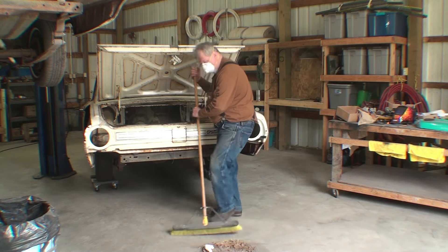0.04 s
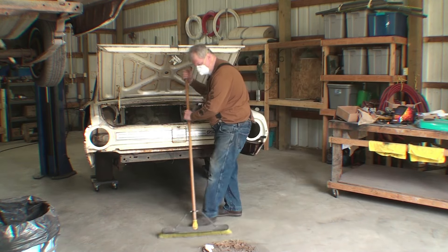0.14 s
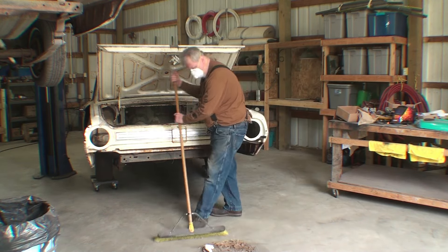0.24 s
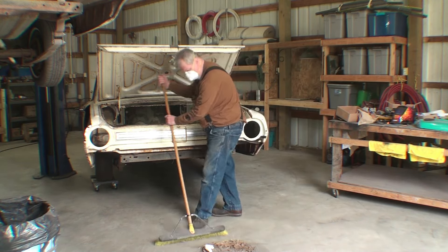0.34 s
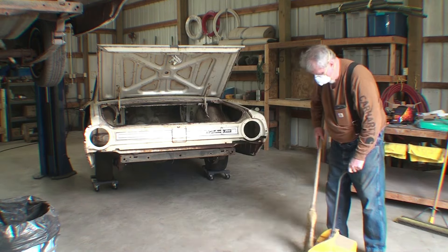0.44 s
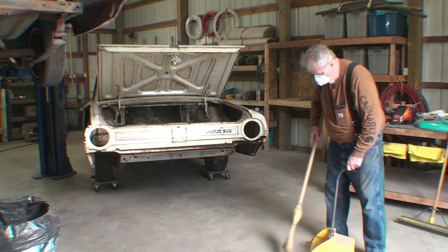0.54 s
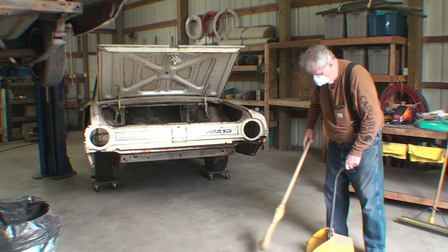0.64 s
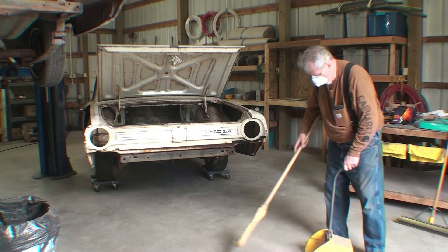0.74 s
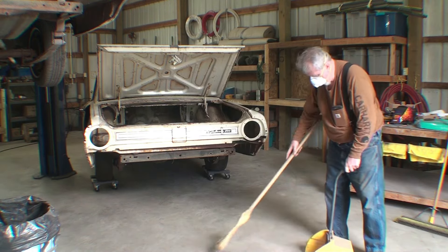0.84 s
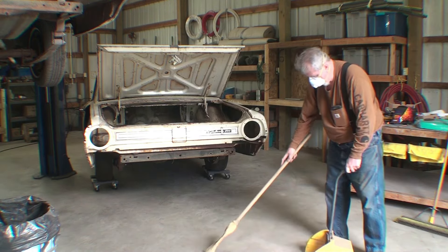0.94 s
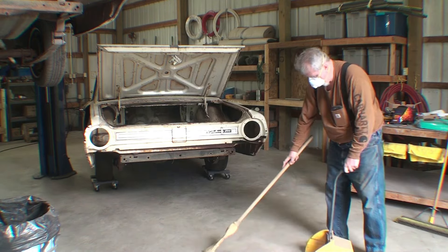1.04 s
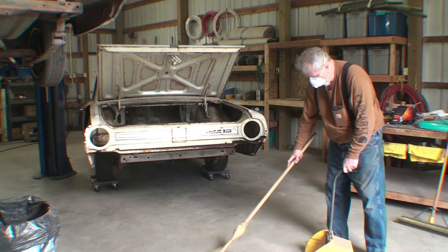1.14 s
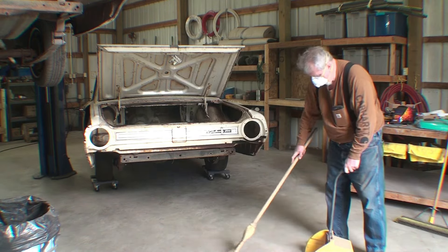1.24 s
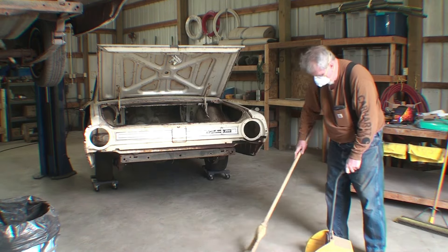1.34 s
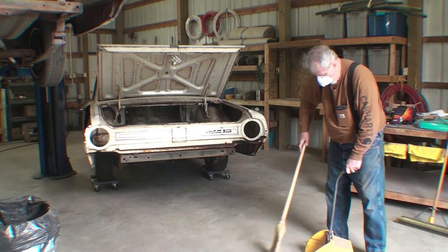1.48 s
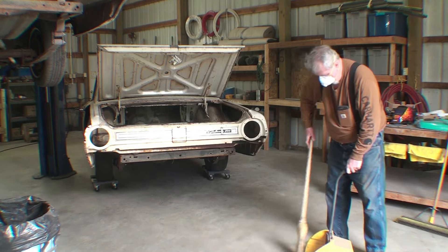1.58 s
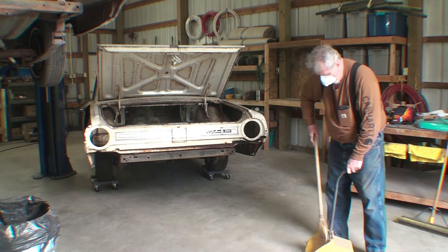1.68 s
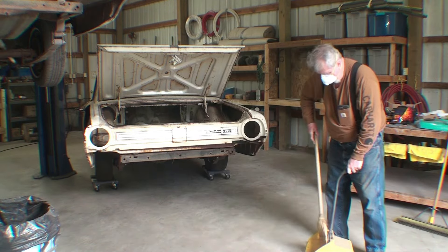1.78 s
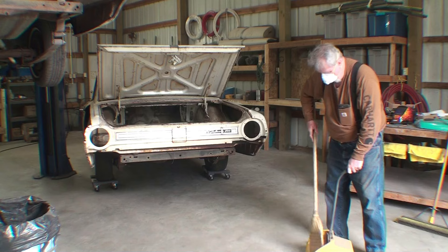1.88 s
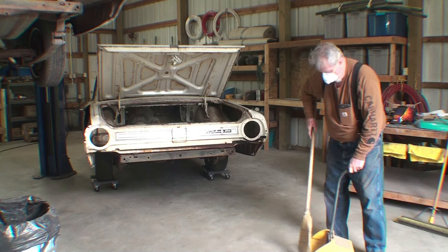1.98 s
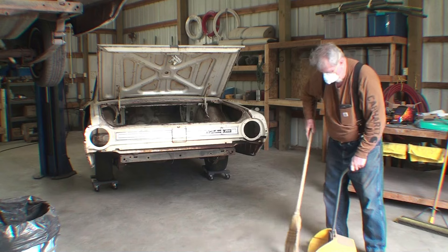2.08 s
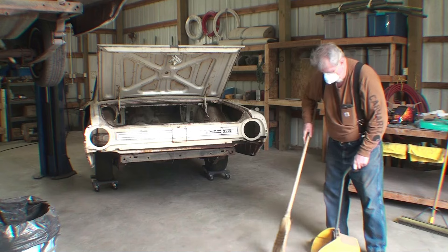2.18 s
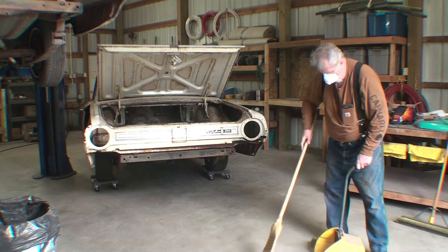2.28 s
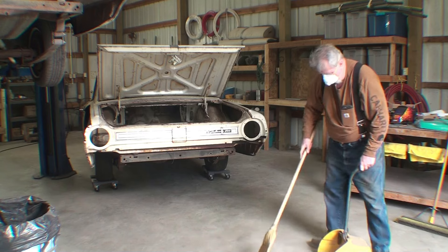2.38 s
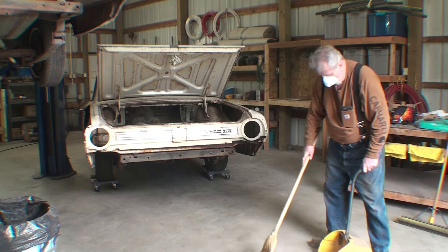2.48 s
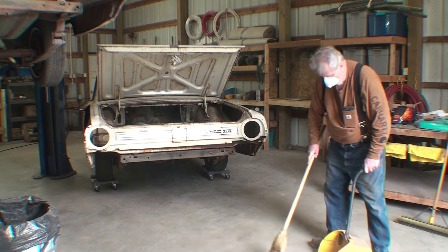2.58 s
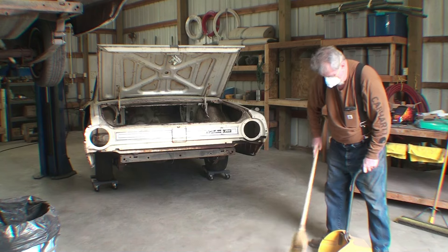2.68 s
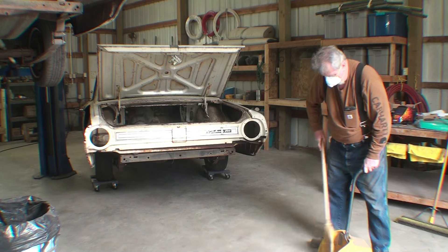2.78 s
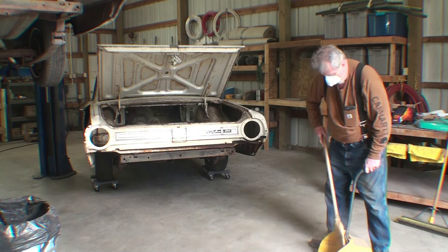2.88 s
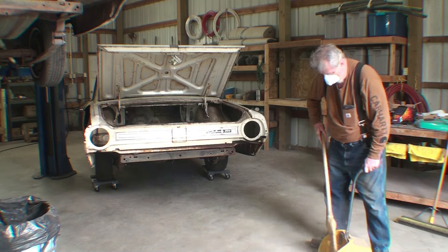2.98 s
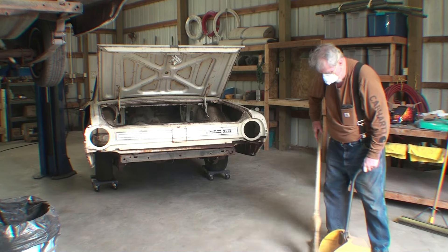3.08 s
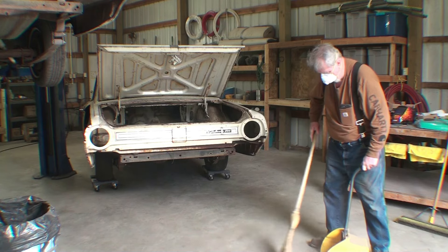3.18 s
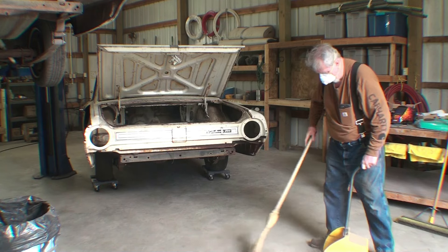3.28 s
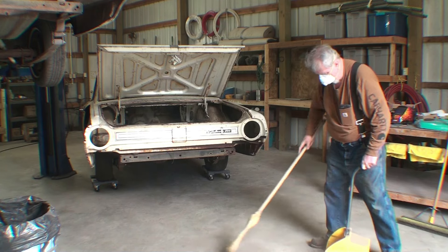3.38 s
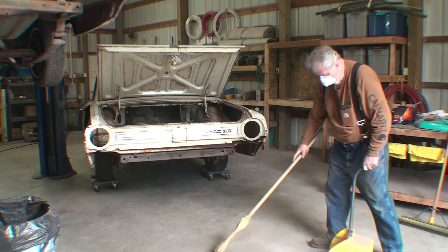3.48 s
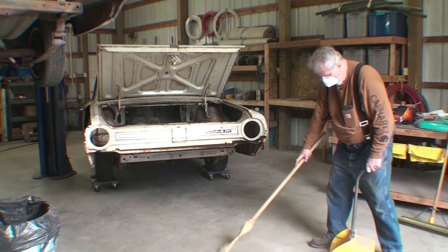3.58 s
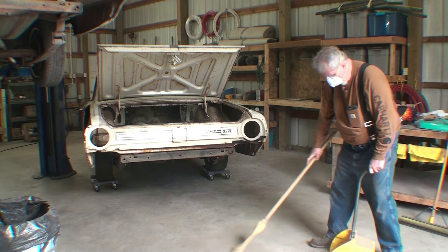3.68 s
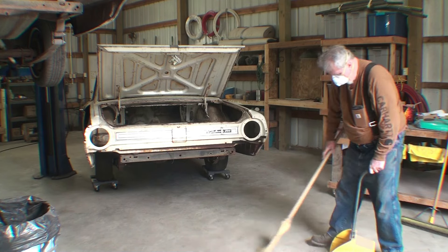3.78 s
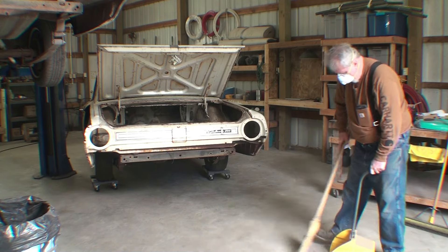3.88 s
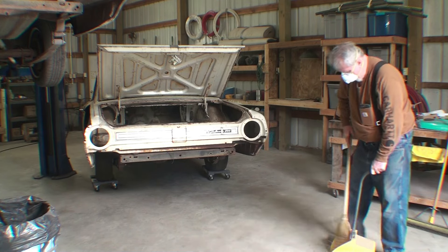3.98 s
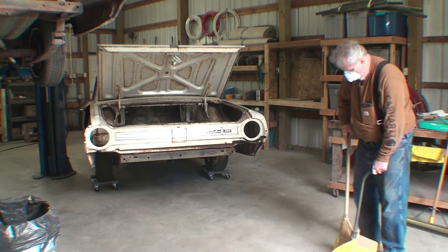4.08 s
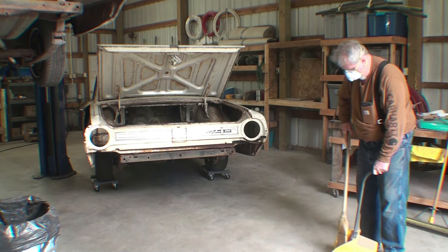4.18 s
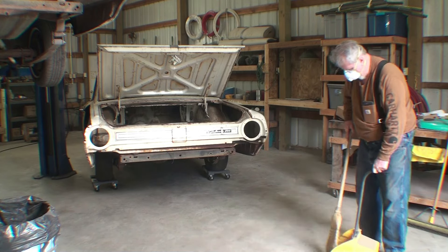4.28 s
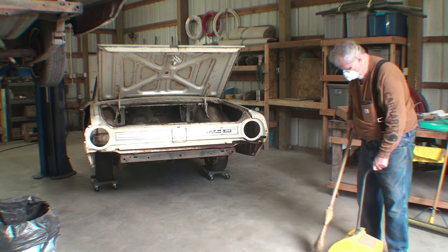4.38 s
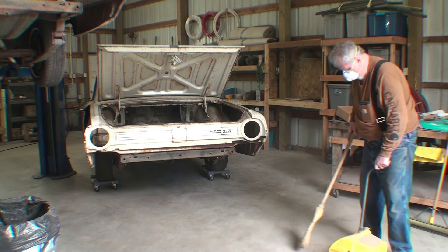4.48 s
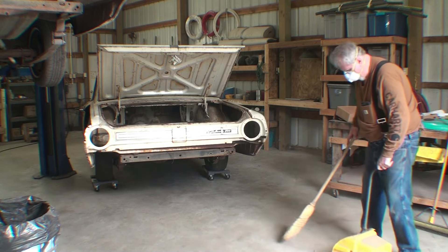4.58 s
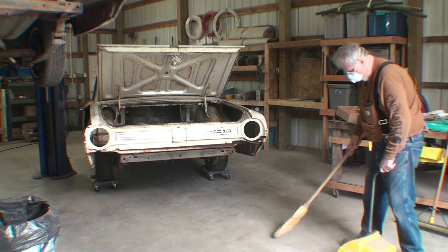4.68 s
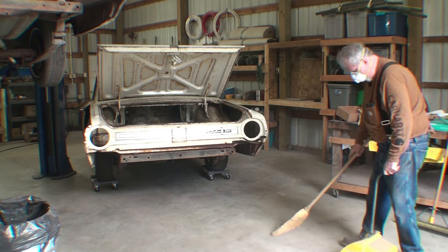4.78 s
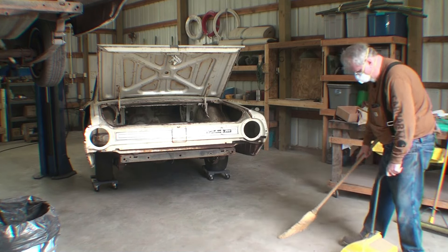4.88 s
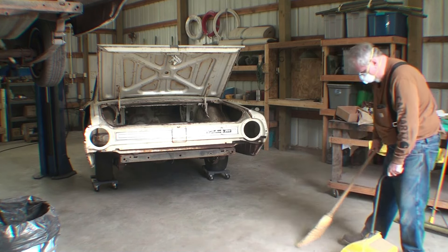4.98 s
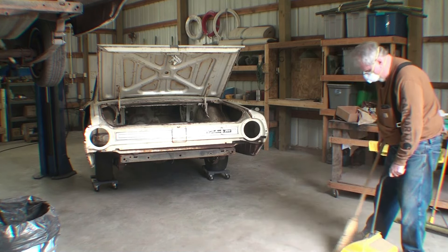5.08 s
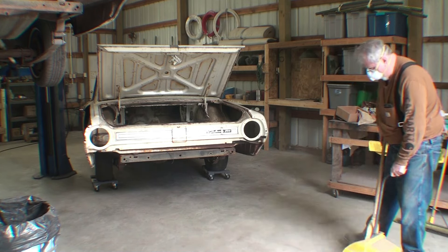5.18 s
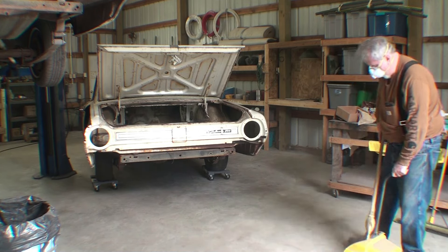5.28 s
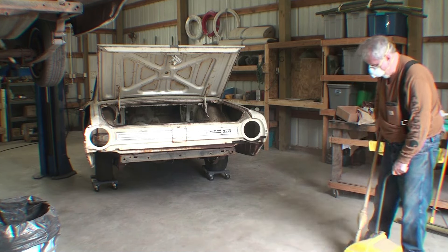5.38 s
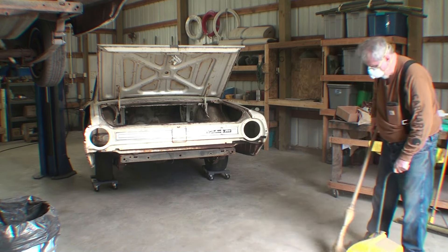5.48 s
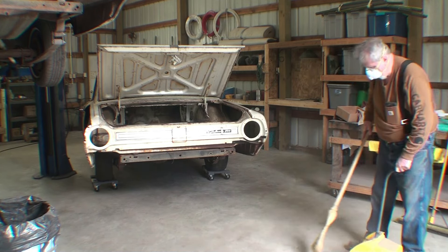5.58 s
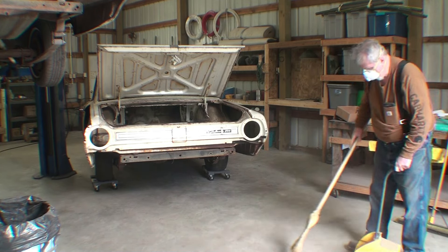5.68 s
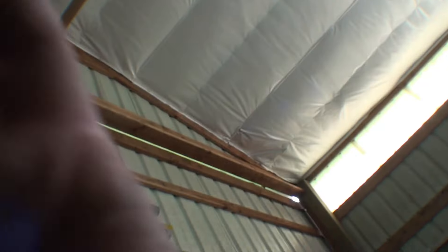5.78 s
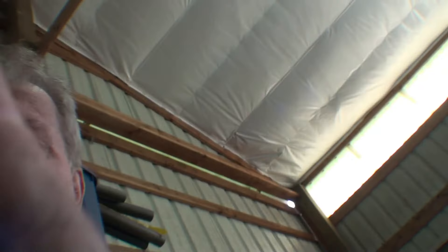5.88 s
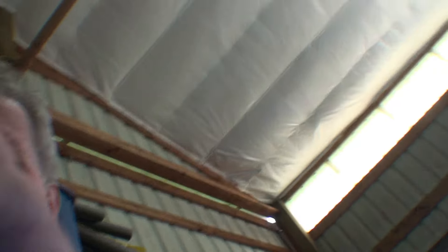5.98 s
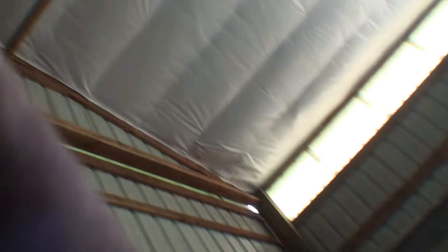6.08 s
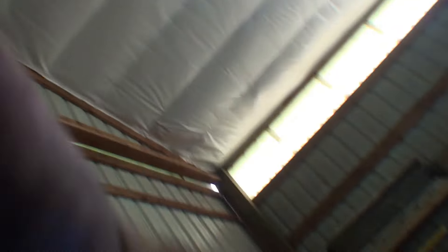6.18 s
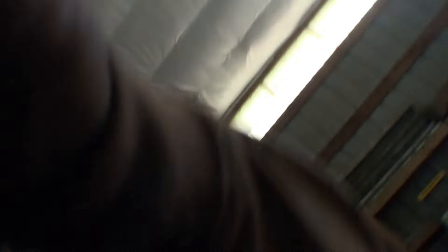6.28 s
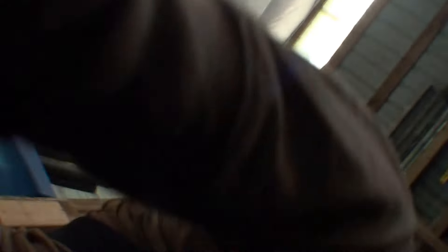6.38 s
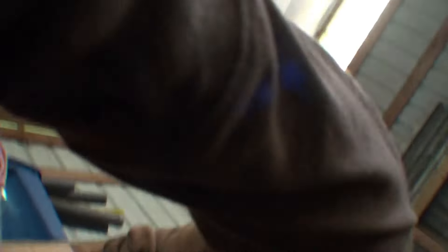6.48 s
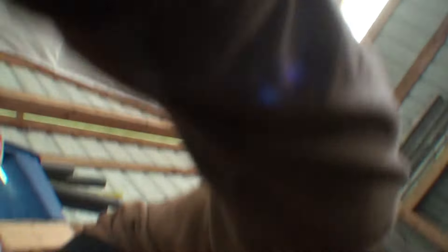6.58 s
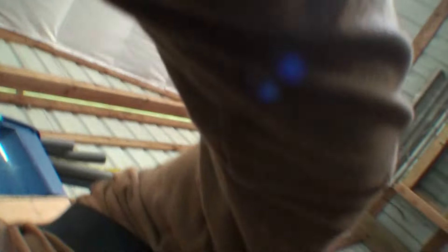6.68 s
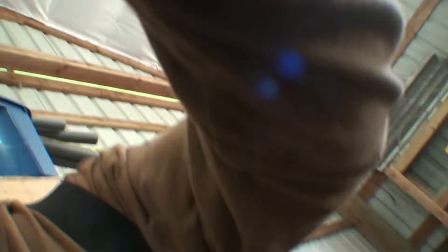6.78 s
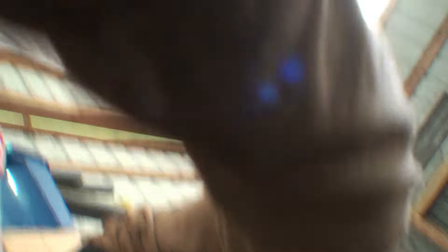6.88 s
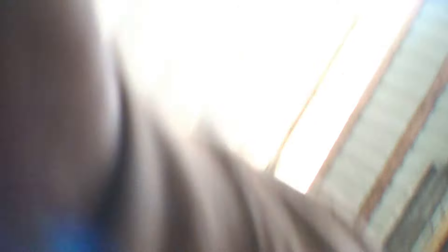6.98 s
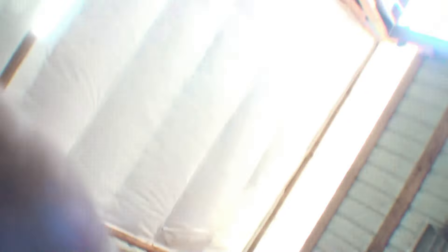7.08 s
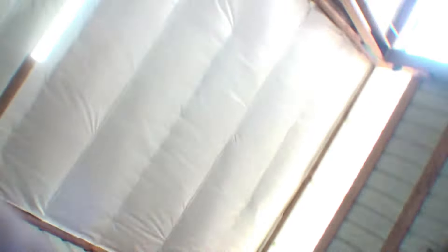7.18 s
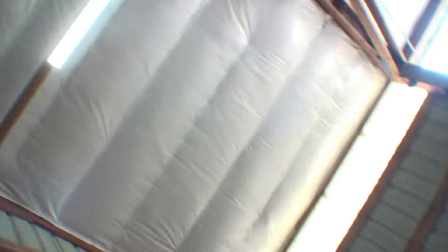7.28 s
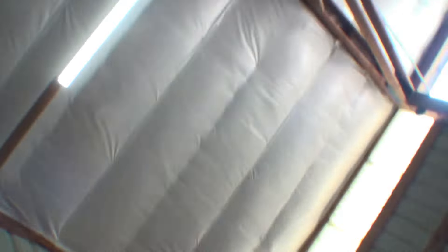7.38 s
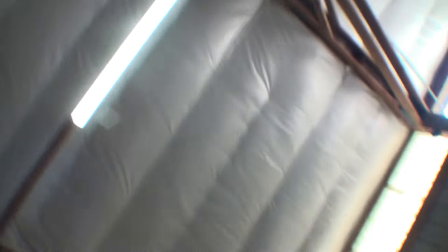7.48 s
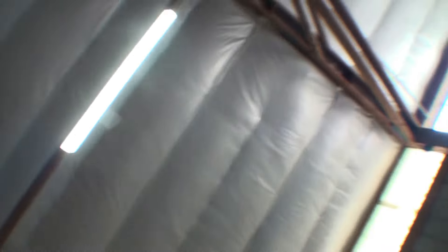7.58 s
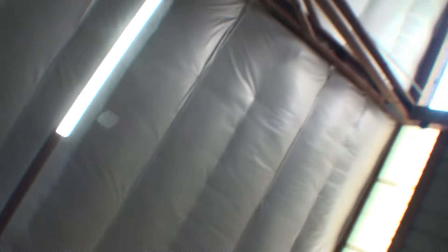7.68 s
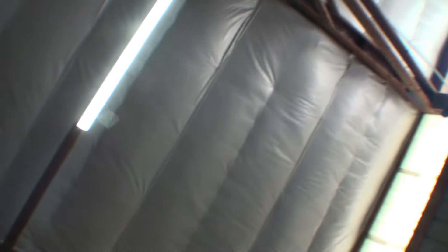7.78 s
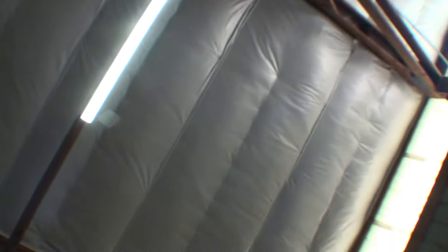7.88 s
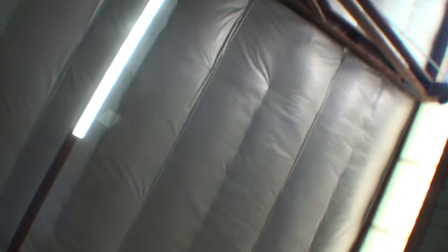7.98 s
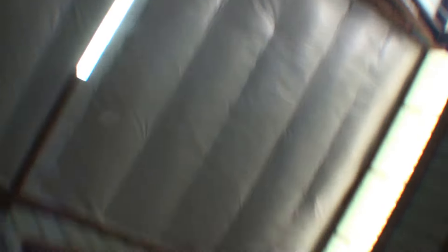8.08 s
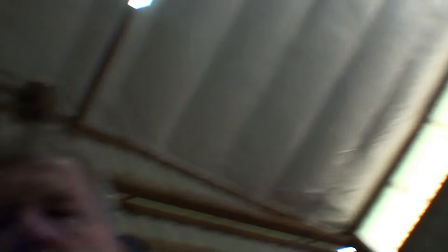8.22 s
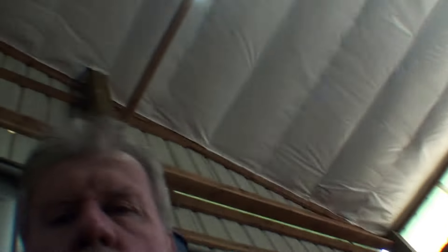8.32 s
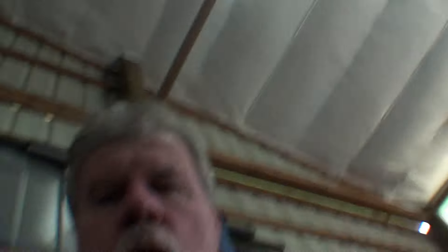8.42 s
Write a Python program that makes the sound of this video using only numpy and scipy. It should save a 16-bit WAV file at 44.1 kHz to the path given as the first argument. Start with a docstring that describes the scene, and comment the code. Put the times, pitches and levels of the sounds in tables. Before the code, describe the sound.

Bristly sweeping strokes and loud clattering knocks on a plastic dustpan ring through a garage, ending abruptly in quiet microphone taps, snaps and sleeve rubbing.

```python
"""Three shots in a steel-clad garage. First a push broom hisses over concrete: band-shaped friction noise.
After a cut a straw broom sweeps dust into a plastic upright dustpan: its modes boom when it is set down
or struck, cracks scatter grit, and dragged edges scrape. The garage answers with sparse reflections.
After a second cut a hand-held camera is turned about: its case clicks and creaks by modal ringing and
stick-slip, and sleeves rustle as gated friction noise. Steady noise forms the air of each shot."""
import sys
import numpy as np
from scipy import signal
from scipy.fft import rfft, irfft, next_fast_len
from scipy.io import wavfile
from scipy.ndimage import uniform_filter1d, minimum_filter1d

SR = 44100
rng = np.random.default_rng(int(sys.argv[2]) if len(sys.argv) > 2 else 0)


def materialize(psi):
    """Save the field psi as 16-bit PCM at rate SR to the path in sys.argv[1].

    A 1-D psi becomes a single channel; in a 2-D psi each row is a channel.
    """
    bounded = np.clip(np.atleast_2d(psi).T, -1, 1)
    quanta = np.round(bounded * 32767).astype(np.int16)
    wavfile.write(sys.argv[1], SR, quanta)


N = 372630
T = np.arange(N) / SR  # time [s]
# sudden brushes and scuffs that fade; the first is the tail of a thump, entered at the cut:
# (time [s], bristle level [dB], scuff level [dB], scuff fade [dB/s])
FADING_SCUFFS = [(0.434, -59, -38.5, 43), (.772, -43, -39.5, 67), (2.433, -49, -22, 160),
                 (3.534, -46, -30.5, 26.5), (4.709, -54.5, -42.5, 198.5), (4.755, -41, -31.5, 94)]
CHATTER_S = 0.0076  # decay time of the chatter after a blow of neutral hardness
CONTACT = 1.41  # first touch of a blow, relative to the rms at which its chatter starts
BURST_DECAY_S = 0.0035  # decay time of cracks and of finger ticks


def broom():
    """Friction: many bristle tips slip on concrete; the broom head adds modal knocks."""
    # bristle hiss swells; the row at .425 is a faint trace of hiss that dies at once after the cut:
    # (start [s], fastest [s], time from which it dies away [s], level at fastest [dB], end level [dB])
    hiss_swells = [(.06, .115, 0.17, -37, -36), (.16, .23, 0.41, -28, -26), (.425, .432, 0.4, -49, -69),
                   (.92, 1.01, 1.15, -46, -59.5), (1.05, 1.33, 1.8, -35, -33.5),
                   (2.51, 2.8, 2.934, -27, -35), (2.95, 3.03, 3.164, -41, -47.5),
                   (3.48, 3.94, 4.06, -28, -28.5), (4.8, 5.09, 5.22, -33, -24.5)]
    # spectrum of the bristle hiss: (frequency [Hz], relative level [dB per Hz])
    bristle_spectrum = [(180, -33), (300, -17), (624, -8.5), (1080, -9), (1870, -4.5), (7820, 3.5),
                        (16000, -11.5)]
    # push-broom head on the floor: (time [s], peak level [dB], hardness [dB/octave])
    knocks = [(.115, -18, -3.5), (.127, -18, 28)]
    # modes of the head: (frequency [Hz], level [dB], t60 [s])
    head_modes = [(666, -6, 0.014), (984, -4, 0.026), (2022, -7, 0.044)]
    brush_fade_db_per_s = 202.5

    tips = evened(colour(grit(per_s=8200, spread_db=2.5, smooth=1.2), bristle_spectrum))
    brush = sudden_fades(np.transpose(FADING_SCUFFS)[1], [brush_fade_db_per_s] * len(FADING_SCUFFS))
    out = (moved(hiss_swells, rise=1.94) + brush) * tips
    chatters = rng.standard_normal((len(knocks), 1500))
    for (s, db, tilt_db), chatter in zip(knocks, chatters):
        ring, _ = strike(head_modes, tilt_db, CHATTER_S, chatter)
        add(out, s, gain_of(db) * ring)
    return out


def dustpan_booms():
    """Modal resonance: blows excite the damped modes of the hollow plastic dustpan."""
    # blows: (time [s], peak level before the bass cut [dB], hardness [dB/octave])
    blows = [(.434, -25, -5), (.485, -22.5, 5), (0.499, -14.5, 3), (.843, -12.5, -7), (.868, -22.5, -1),
             (1.661, -18, 10), (1.677, -5.5, 6.5), (1.714, -2, 2.5), (1.729, 1.5, 7), (2.436, -11, 8),
             (2.468, -0.5, -1), (2.479, -8.5, -1), (2.497, -7, -10.5), (2.856, -11.5, 10), (2.899, 0.5, 4),
             (2.925, -9.5, -4), (3.008, -7.5, 7.5), (3.677, -3.5, -16), (3.995, -5.5, -1), (4.03, -9.5, 11),
             (4.04, -0.5, -1.5), (4.059, 0.5, 2.5), (4.424, -32, 10), (4.71, -18, 2.5), (4.851, -13, -18.5),
             (5.18, -1.5, 0), (5.202, 6, -10.5), (5.229, -4, 17.5)]
    # modes of the dustpan: (frequency [Hz], level [dB], t60 [s])
    pan_modes = [(135, -15.5, 0.092), (223, 2, 0.072), (258, 0, 0.069), (282, -0.5, 0.057),
                 (360.4, -1, 0.045), (452, -7, 0.024), (512, -8.5, 0.034), (636, -8, 0.078),
                 (686, -10.5, 0.067)]
    chatter_growth_db = 0.12  # dB of chatter time per unit of hardness

    boom = np.zeros(N)
    chatters = rng.standard_normal((len(blows), 3000))
    for (s, db, tilt_db), chatter in zip(blows, chatters):
        rattle = CHATTER_S * gain_of(chatter_growth_db * tilt_db)
        ring, _ = strike(pan_modes, tilt_db, rattle, chatter, order=1)
        add(boom, s, gain_of(db) * ring)
    return no_bass(boom, 134)


def cracks_and_grit():
    """Broadband impact: broom on plastic gives a decaying noise burst and scatters swept grit into the pan."""
    # cracks: (time [s], crack peak level [dB], grit scale [dB], hardness [dB/octave])
    cracks = [(0.4867, -24, -31, -6), (1.677, -7.5, -14, -5), (1.6891, -10, -19.5, -1.5),
              (1.711, 0, -3, -2), (2.8554, -7, -24, -3), (2.8973, -5, -13, -0.5), (3.0088, -10, -15, -6.5),
              (4.0386, 7, -3, -1.5), (4.7102, -25.5, -27, -4.5), (4.782, -17, -27, 3.5),
              (5.178, 1, -8, -0.5), (5.199, -12.5, -1, -2)]
    # spectrum of cracks and grit: (frequency [Hz], gain [dB])
    crack_spectrum = [(290, -25.5), (500, -1), (5500, -6.5), (9360, -26), (16000, -32)]
    grit_s = 0.026  # the grit is loudest this long after the crack

    crack, spray = np.zeros((2, N))
    pivot_hz = crack_spectrum[1][0]
    u = np.arange(8000) / SR / grit_s
    chatters = rng.standard_normal((len(cracks), 1000))
    for (s, db, grit_db, tilt_db), chatter in zip(cracks, chatters):
        burst = np.append(CONTACT, chatter[1:]) * np.exp(-np.arange(len(chatter)) / SR / BURST_DECAY_S)
        tilted = [(f, v + tilt_db * np.log2(f / pivot_hz)) for f, v in crack_spectrum]
        snap = colour(burst, tilted)
        add(crack, s, gain_of(db) * snap / abs(snap).max())
        add(spray, s, gain_of(grit_db) * u * np.exp(-u))  # swells and thins out
    return crack, colour(spray * grit(per_s=3500, spread_db=4.0, smooth=0.65), crack_spectrum)


def drags_and_scuffs():
    """Sliding friction: the broom head or the lip of the dustpan scrapes dully over the floor."""
    # drags: (start [s], fastest [s], end [s], level at fastest [dB], level at end [dB])
    drags = [(.1, .118, 0.2, -27.5, -45.5), (.15, .3, 0.42, -44, -43), (.465, .49, 0.56, -30, -52),
             (2.78, 2.86, 3, -27.5, -28.5)]
    # spectrum of the scrape: (frequency [Hz], relative level [dB per Hz])
    lip_spectrum = [(59, -37), (100, -9.5), (283, -4), (684, -4.5), (12000, -30), (15600, -58)]
    scrape = evened(colour(grit(per_s=3100, spread_db=3.0, smooth=1.0), lip_spectrum))
    scuffs = sudden_fades(*np.transpose(FADING_SCUFFS)[2:])
    return (moved(drags, rise=2.4) + scuffs) * scrape


def camera_taps():
    """Modal resonance at close range: taps and snaps ring small parts and add a brighter contact tick."""
    # taps on the body: (time [s], level before the bass cut [dB], hardness [dB/octave], left-right [dB])
    clicks = [(5.873, -26, 3, 4), (6.348, -12.5, 5, 6.5), (6.36, -30, 10, -23), (6.447, -30.5, -15.5, 0),
              (6.751, -36.5, -9, 1), (6.893, -32, 12.5, 8), (7.086, -57, 21.5, 7.5), (7.601, -29.5, 8, 6),
              (8.109, -37, -7, -1), (8.184, -20, -8.5, 0)]
    # modes of the body: (frequency [Hz], level [dB], t60 [s])
    case_modes = [(280, 0.5, 0.097), (564, 7, 0.042), (1000, 17.5, 0.029), (1095, 9, 0.044),
                  (1570, 23, 0.0055), (2310, 5.5, .01)]
    # snaps of a loose flap: (time [s], level before the bass cut [dB], hardness [dB/octave], left-right [dB])
    snaps = [(6.964, -7, 4, 6), (7.87, -46, 6, 11), (7.881, -9, 5, 6.5)]
    # modes of the flap: (frequency [Hz], level [dB], t60 [s])
    flap_modes = [(765, 0.5, 0.023), (1292, -4, 0.013), (1506, -1.5, .012), (2310, -7.5, 0.02)]

    # each tap: modes, chatter decay [s], lowest frequency [Hz], then its row
    taps = [(case_modes, .0012, 238, *row) for row in clicks]
    taps += [(flap_modes, .003, 560, *row) for row in snaps]
    out = np.zeros((2, N))
    chatters = rng.standard_normal((len(taps), 1500))
    for (modes, rattle, low_hz, s, db, tilt_db, pan_db), chatter in zip(taps, chatters):
        ring, push = strike(modes, tilt_db, rattle, chatter)
        sides = gain_of([[db + pan_db / 2], [db - pan_db / 2]])
        add(out, s, sides * no_bass(ring, low_hz))
        tick = no_bass(uniform_filter1d(push, size=2), 2800)
        add(out, s, sides * gain_of(1.92 * tilt_db - 5.0) * tick)  # harder taps tick louder
    return out


def case_creak():
    """Stick-slip: a joint of the case creaks in a run of bare, uneven slips."""
    start_s, length_s, unit_slip_db, pan_db = 6.989, .021, -17, -12
    count, slip_s = 8, .00012
    out = np.zeros((2, N))
    sides = gain_of([[unit_slip_db + pan_db / 2], [unit_slip_db - pan_db / 2]])
    for k, (late, size) in enumerate(rng.random((count, 2))):
        slip = (0.45 + 1.9 * size) * np.hanning(round(slip_s * SR))
        add(out, start_s + length_s * (k + late) / count, sides * slip)
    return out


def sleeve_rub():
    """Friction of cloth: sleeves and fingers brush the case in smooth swells and faint random ticks."""
    # brushes: (start [s], length [s], level before brightness [dB], brightness [dB])
    rustles = [(5.853, 0.05, -49, -1), (5.989, 0.094, -54, -1.5), (6.064, 0.12, -56.5, -4.5),
               (6.522, 0.076, -48, 3), (6.865, 0.11, -42.5, 6), (6.948, 0.093, -37, 7),
               (7.008, 0.084, -54, 4.5), (7.353, 0.11, -46, 5), (7.548, 0.15, -47, -4),
               (7.846, 0.065, -39.5, -6.5), (7.981, 0.12, -45.5, 5.5)]
    # spectrum of the cloth: (frequency [Hz], relative level [dB per Hz])
    cloth_spectrum = [(120, -48), (200, -5), (1550, 5), (6640, -21), (16000, -28.5)]
    fidgets_per_s, weakest_fidget_db = 9, -58

    cloth = evened(colour(grit(per_s=1800, spread_db=4, smooth=.8), cloth_spectrum))
    bright = no_bass(cloth, 3000)
    fidget_db = weakest_fidget_db + 3.1 * np.minimum(rng.exponential(1, N), 3)
    fidgets = gain_of(fidget_db) * (rng.random(N) < fidgets_per_s / SR)
    decay = np.exp(-np.arange(400) / SR / BURST_DECAY_S)
    rub = np.convolve(fidgets, decay)[:N] * (cloth + 5.0 * bright)
    for s, length, db, bright_db in rustles:
        part = slice(round(s * SR), round((s + length) * SR))
        brush = cloth[part] * gain_of(-bright_db) + bright[part] * gain_of(bright_db)
        add(rub, s, gain_of(db) * brush * np.hanning(len(brush)))
    apart = 0.82 * np.roll(rub, 300)  # each capsule hears partly its own rubbing
    return np.array([rub + apart, rub - apart])


def handling():
    """Near field: dry sounds at the microphone; with the camera on its side the right capsule hears later."""
    right_late_s = .00014  # for taps and creak
    hard = camera_taps() + case_creak()
    hard[1] = np.roll(hard[1], round(right_late_s * SR))
    return hard + sleeve_rub()


def garage(x):
    """Reverberation: sparse reflections of random sign, each band dying at its own rate, partly shared."""
    # reverberation time: (frequency [Hz], t60 [s])
    reverb_times = [(100, 0.73), (250, 0.4), (1000, 0.5), (3000, 0.67), (7000, 0.75), (14000, 0.19)]
    taps = np.zeros((3, SR))  # own left, own right, shared
    at = np.arange(400, SR - 20, 20) + rng.integers(0, 20, (3, (SR - 401) // 20))
    np.put_along_axis(taps, at, rng.choice([-1., 1.], at.shape), 1)
    hz, t, z = signal.stft(taps[2] + 0.59 * taps[:2], SR, nperseg=256)
    fade = gain_of(-60 * t / read(reverb_times, hz)[:, None])
    tail = signal.istft(z * fade, SR, nperseg=256)[1]
    return signal.fftconvolve(x[None], tail / np.linalg.norm(tail[0]), axes=1)[:, :N]


def air(spectrum, db):
    """Diffuse field: steady noise with drifting patches, its channels correlated by frequency."""
    # left-right correlation of the air: (frequency [Hz], likeness [0 to 1])
    likeness = [(110, 1), (1000, 0.62), (8000, 0.6), (13000, 0.65)]
    frames, hz = N // 256 + 5, np.fft.rfftfreq(1024, 1 / SR)
    a, b, c, d, patches = rng.standard_normal((frames, 513, 5)).T
    patches = uniform_filter1d(patches, 12, 0)  # over frequency
    patches = evened(uniform_filter1d(patches, 14, 1))  # over time
    same = np.clip(read(likeness, hz), -1, 1)[:, None]
    left, other = a + 1j * b, c + 1j * d
    z = np.array([left, same * left + np.sqrt(1 - same ** 2) * other])
    z *= gain_of(read(spectrum, hz)[:, None] + 1.1 * patches)
    noise = signal.istft(z, nperseg=1024, noverlap=768)[1][:, :N]
    return gain_of(db) * evened(noise)


def grit(per_s, spread_db, smooth):
    """Friction as a random pulse train: tiny slips of uneven size over a smooth hiss."""
    sizes = gain_of(spread_db * np.minimum(rng.exponential(1, N), 3))
    slips = sizes * (rng.random(N) < per_s / SR)
    return evened(evened(slips * rng.standard_normal(N)) + smooth * rng.standard_normal(N))


def strike(modes, tilt_db, rattle, chatter, order=0):
    """Modal excitation: a contact and its chatter drive damped modes; soft contacts favour the main one."""
    main_hz = modes[order][0]
    t = np.arange(round(.4 * SR)) / SR
    hz, db, t60 = np.transpose(modes)[:, :, None]
    mode_db = db + tilt_db * abs(np.log2(hz / main_hz)) - 60 * t / t60
    ring = (gain_of(mode_db) * np.sin(2 * np.pi * hz * t)).sum(0)
    push = np.append(CONTACT, chatter[1:]) * np.exp(-np.arange(len(chatter)) / SR / max(rattle, 1e-4))
    push /= np.linalg.norm(push)
    sound = signal.fftconvolve(ring, push)
    return sound / abs(sound).max(), push


def moved(rows, rise):
    """Friction grows as a power of speed: a quarter-sine rise, a slide in level, a fast fade from the end."""
    fade_db_per_s = 400
    power = np.zeros(N)
    for start, top, end, top_db, end_db in rows:
        speed = np.sin(np.pi / 2 * np.clip((T - start) / max(top - start, 1e-3), 0, 1))
        slide_db = np.interp(T, [top, max(end, top + 1e-3)], [top_db, end_db])
        level_db = slide_db - fade_db_per_s * np.maximum(T - end, 0)
        power += (speed ** rise * gain_of(level_db)) ** 2
    return np.sqrt(power)


def sudden_fades(levels_db, fades):
    """Exponential decay: sudden starts that fade evenly in dB."""
    longest_s = .13
    out = np.zeros(N)
    for row, db, fade in zip(FADING_SCUFFS, levels_db, fades):
        add(out, row[0], gain_of(db - fade * np.arange(0, longest_s, 1 / SR)))
    return out


def no_bass(x, hz):
    """Radiation: a small object radiates no deep bass, modelled by a fourth-order high-pass."""
    return signal.sosfilt(signal.butter(4, hz, "high", fs=SR, output="sos"), x)


def colour(x, points):
    """Linear filtering: multiplies the spectrum by a gain curve in dB."""
    size = next_fast_len(x.shape[-1])
    gain = gain_of(read(points, np.fft.rfftfreq(size, 1 / SR)))
    return irfft(rfft(x, size) * gain, size)[..., :x.shape[-1]]


def read(points, hz):
    """Interpolates a frequency table on a logarithmic frequency axis."""
    f, value = np.transpose(points)
    return np.interp(np.log(hz + 1), np.log(f + 1), value)


def gain_of(db):
    """Decibel law: level in dB to amplitude gain."""
    return 10 ** (np.asarray(db) / 20)


def evened(x):
    """Normalises the mean power: scales to rms 1."""
    return x / np.sqrt(np.mean(x ** 2) + 1e-20)


def add(mix, s, sound):
    """Superposition: adds a sound to the mix from a time in seconds."""
    part = mix[..., round(s * SR):][..., :sound.shape[-1]]
    part += sound[..., :part.shape[-1]]


def scene():
    """Superposition of direct sound, reverberation and air, each shot heard only between its cuts."""
    # cuts between the shots: (first [s], second [s])
    cuts = (.431, 5.734)
    # still air of the garage, a row per shot: (spectrum of (frequency [Hz], relative level [dB per Hz]),
    # level [dB])
    air_of_shot = [([(20, -12.5), (738, -18.5), (1060, -17), (8180, -38), (16000, -49)], -35),
                   ([(12, -39.5), (20, 3), (143, -2.5), (555, -5), (1020, -7.5), (3650, -15.5),
                   (15000, -32)], -45.5), ([(20, -9), (96, -4.5), (849, -8.5), (3840, -26.5),
                   (11800, -31.5), (14300, -37.5), (16000, -52.5)], -57)]

    shot = np.searchsorted(cuts, T)
    bristles, boom, scrape = broom(), dustpan_booms(), drags_and_scuffs()
    crack, spray = cracks_and_grit()
    lip = spray + scrape
    direct = bristles + boom + crack + lip
    sent = gain_of(-6.0) * bristles + gain_of(-5.0) * boom + gain_of(-7.5) * crack + gain_of(-5.0) * lip
    shots = []
    for k in (0, 1):
        inside = shot == k
        shots.append(direct * inside + garage(sent * inside) + air(*air_of_shot[k]))
    shots.append(handling() + air(*air_of_shot[2]))
    return np.choose(shot, shots)


def record(dry):
    """Gain control: the left leans to the bass, a fast limiter flattens the blows, a low-pass ends the band."""
    # channel balance: (frequency [Hz], left-right [dB])
    lean = [(80, 1), (250, 1.5), (1500, 0.5), (15000, -0.6)]
    edge_hz = 15900
    left = colour(dry[0], [(f, v / 2) for f, v in lean])
    right = colour(dry[1], [(f, -v / 2) for f, v in lean])
    leaned = np.array([left, right])
    safe_gain = np.minimum(.95 / (abs(leaned).max(0) + 1e-9), 1)
    held = leaned * uniform_filter1d(minimum_filter1d(safe_gain, size=100), size=100)
    low_pass = signal.firwin(511, edge_hz, window=("kaiser", 9), fs=SR)
    return signal.oaconvolve(held, low_pass[None], "same")


dry = scene()
out = record(dry)
materialize(out)
```